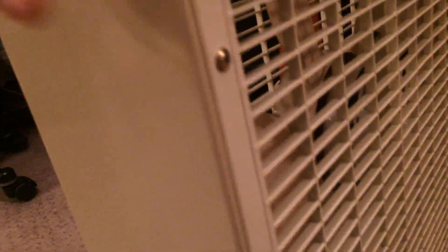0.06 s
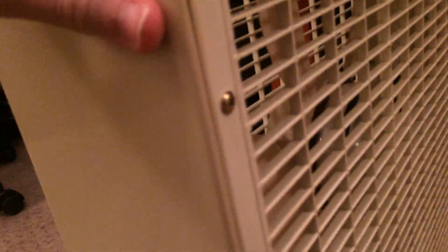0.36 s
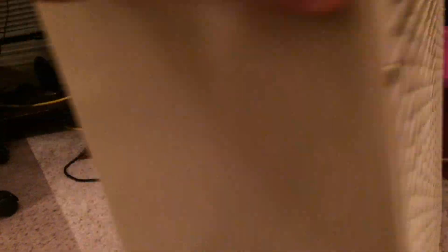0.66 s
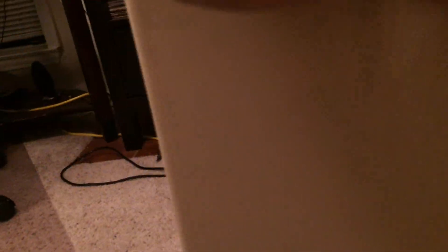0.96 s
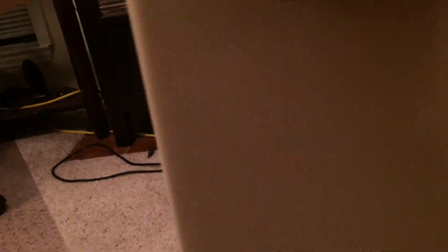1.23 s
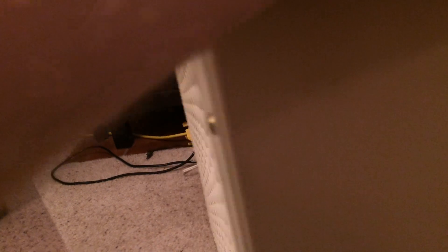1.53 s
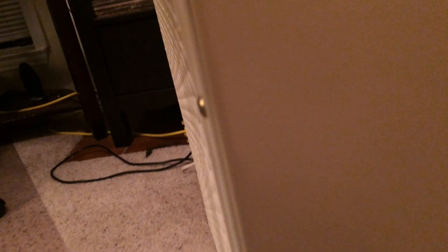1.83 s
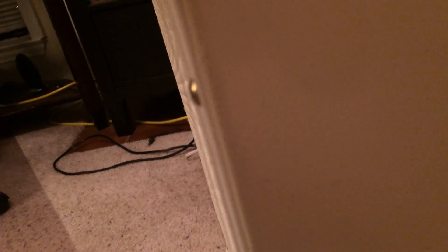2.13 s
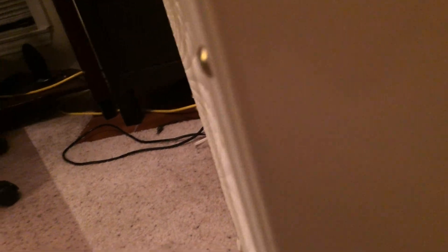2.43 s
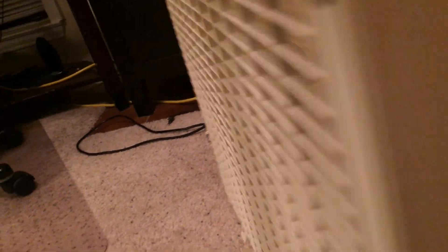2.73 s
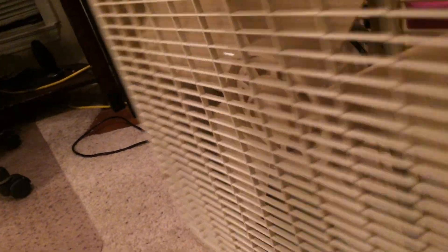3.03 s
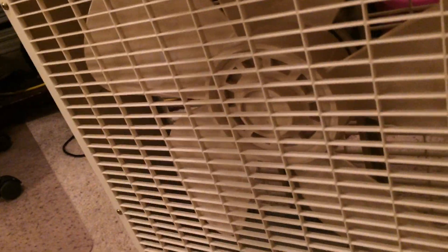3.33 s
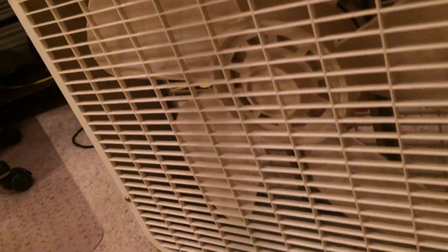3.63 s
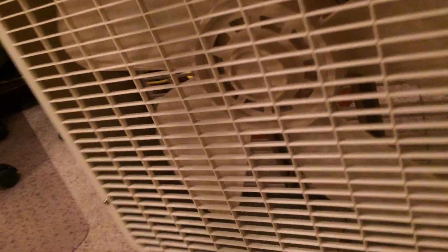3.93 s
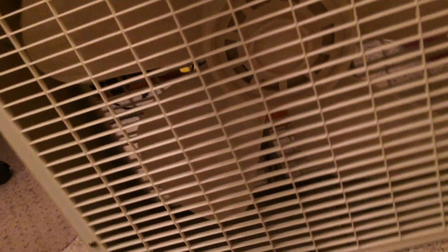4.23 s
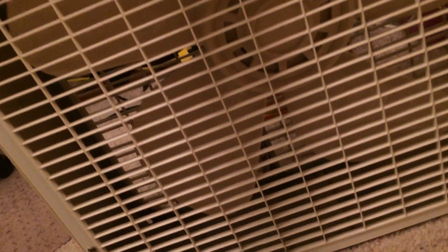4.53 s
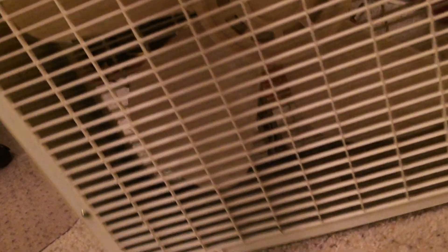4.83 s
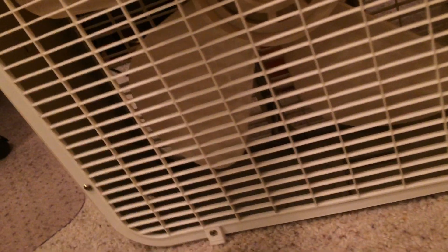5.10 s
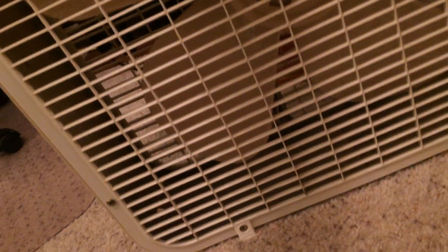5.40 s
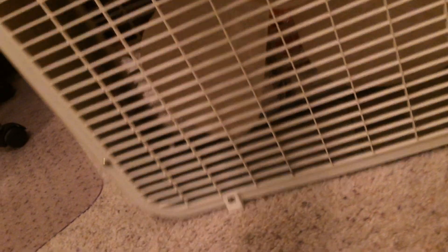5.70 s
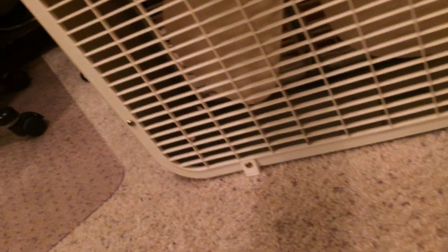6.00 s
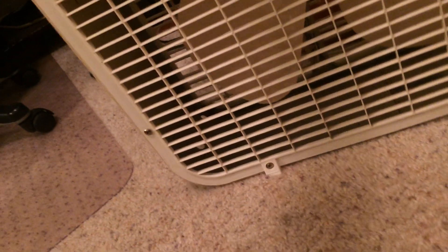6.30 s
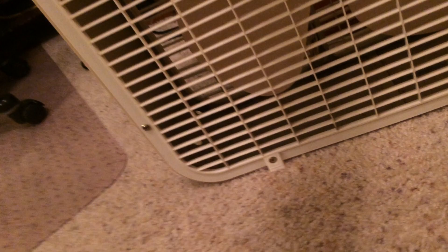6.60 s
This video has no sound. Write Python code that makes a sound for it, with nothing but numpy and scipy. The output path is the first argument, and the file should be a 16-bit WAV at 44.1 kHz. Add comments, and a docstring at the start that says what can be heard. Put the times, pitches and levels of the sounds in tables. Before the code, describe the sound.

A switched-off box fan is set down twice on carpet, each sharp knock ringing its sheet-metal case and rattling the plastic grilles. As it is turned around, the case drags softly over the pile with small ticks and faint creaks, and a hand bumps it dully. Soft rubbing strokes and a light click follow. The microphone is close, in a small room with a low electrical hum.

```python
"""The sheet-metal case of a switched-off box fan is set down twice on carpet, close to the microphone.
Each knock rings the panels and shakes the plastic grilles, which buzz and tick. As the fan is walked
round, the case drags over the pile, its foot scrapes, its frame creaks, and hands bump and brush it.
Soft rubbing strokes and a light click follow. Behind it all is a small room with a low mains hum."""
import sys
import numpy as np
from scipy import signal
from scipy.fft import rfft, irfft
from scipy.io import wavfile
from scipy.ndimage import uniform_filter1d

SR = 44100
rng = np.random.default_rng(int(sys.argv[2]) if len(sys.argv) > 2 else 0)


def int16_out(signal):
    """Quantize to a 16-bit WAV file."""
    q = np.round(np.clip(np.atleast_2d(signal).T, -1, 1) * 32767)
    wavfile.write(sys.argv[1], SR, q.astype(np.int16))


N = 297675
T = np.arange(N) / SR
RING_T = np.arange(SR) / SR  # one second for a struck sound to die away


def gain_of(db):
    """Decibels to amplitude."""
    return 10 ** (np.asarray(db) / 20)


def unit_rms(x):
    """Scales x to rms 1."""
    return x / np.sqrt(np.mean(x ** 2) + 1e-20)


def curve_at(points, hz):
    """Interpolates (Hz, value) points on a log-frequency axis."""
    f, value = np.transpose(points)
    return np.interp(np.log(hz + 1), np.log(f + 1), value)


def add(mix, start, sound):
    """Mixes a sound in at a time in seconds."""
    part = mix[round(start * SR):][:len(sound)]
    part += sound[:len(part)]


def coloured(x, colour, extra_db=lambda hz: 0):
    """Filters x by (Hz, dB) points, plus an optional dB function of frequency."""
    hz = np.fft.rfftfreq(2 * len(x), 1 / SR)
    return irfft(rfft(x, 2 * len(x)) * gain_of(curve_at(colour, hz) + extra_db(hz)))[:len(x)]


def noise(size, colour):
    """Noise of rms 1, shaped by (Hz, dB) points."""
    return unit_rms(coloured(rng.standard_normal(size), colour))


def wander(rate_hz):
    """A smooth random drift of rms 1, up to the given rate."""
    hz = np.fft.rfftfreq(N, 1 / SR)
    return unit_rms(irfft(rfft(rng.standard_normal(N)) / (1 + (hz / rate_hz) ** 4), N))


def during(start, end):
    """A soft-edged window between two times."""
    return np.sin(np.pi / 2 * np.clip(np.minimum(T - start, end - T) / 0.026, 0, 1)) ** 2


def arch(start, end):
    """A push that swells and eases between two times."""
    return np.sin(np.pi * np.clip((T - start) / (end - start), 0, 1))


def attack(rise_s, power=1):
    """An onset rising from 0 to 1; power 2 starts more gently."""
    return 1 - np.exp(-(RING_T / rise_s) ** power)


def modes(table):
    """Struck modes from (Hz, dB, t60 s) rows, neighbours swinging in opposite senses."""
    return sum((-1) ** k * gain_of(db - 60 * RING_T / t60) * np.sin(2 * np.pi * hz * RING_T)
               for k, (hz, db, t60) in enumerate(table))


def clicks(size, per_s, spread_db):
    """A random train of clicks of uneven size and sign."""
    chance, height, sign = rng.random((3, size))
    return (chance < per_s / SR) * gain_of(-spread_db * height) * np.sign(sign - .5)


# Mains hum in the small room. Each row: frequency in Hz, rms level in dB.
HUM_PARTIALS = [(101, -73.5), (120, -50.5), (240, -68)]
# A faint tone that comes and goes in the background. Each row: start and end in seconds, level in dB.
WHINE_SPELLS = [(0.524, 0.65, -59), (0.713, 0.82, -55), (5.35, 5.606, -67), (6.427, 6.677, -62)]
# Room tone behind the fan, rumble and air. Each row: frequency in Hz, relative level in dB.
RUMBLE_COLOUR = [(15, -4), (60, 0.5), (100, 5), (160, -2.5), (210, 1.5), (290, -13.5), (600, -42)]
AIR_COLOUR = [(180, -43), (300, -14), (366, -9.5), (439, -14), (1240, -21), (2610, -30.5), (15500, -48.5)]
def room(whine_hz=445, rumble_db=-53.5, air_db=-65):
    """Slightly wavering hum and a faint whine over a dull rumble and a thin hiss of air."""
    hum = sum(gain_of(db + 1.1 * wander(0.67)) * np.sqrt(2) * np.sin(2 * np.pi * hz * T)
              for hz, db in HUM_PARTIALS)
    whine = np.sqrt(2) * np.sin(2 * np.pi * whine_hz * T + .7 * wander(16))
    whine *= sum(gain_of(db) * during(start, end) for start, end, db in WHINE_SPELLS)
    rumble = gain_of(rumble_db) * noise(N, RUMBLE_COLOUR)
    air = gain_of(air_db) * noise(N, AIR_COLOUR)
    return hum + whine + rumble + air


# Fingertips on the painted metal, faint even up close. Each row: start and end in seconds, level in dB.
FINGER_BRUSHES = [(0.136, 0.3, -67), (3.467, 3.586, -67)]
def brushes():
    """Dry skin on paint gives a thin, bright hiss."""
    hiss = noise(N, [(3000, -8), (7000, 2), (14000, 5.5)])
    return hiss * sum(gain_of(db) * during(start, end) for start, end, db in FINGER_BRUSHES)


def friction(rubs, colour, snag_db, fade_db, bluntness, ring_hz, ring_db, ring_width_hz):
    """Countless fibres let go, a few snagging harder; the hiss swells with the sliding speed."""
    out = np.zeros(N)
    ripple_hz = np.linspace(700, 16000, 170)  # closely spaced resonances
    for start, fastest, stop, db in rubs:
        t = np.arange(start, stop, 1 / SR)
        slowness = np.interp(t, [start, fastest, stop], [1, 0, 1])
        swell = gain_of(db - fade_db * slowness ** bluntness) * signal.windows.tukey(len(t), 0.1)
        snags = unit_rms(clicks(2 * SR, per_s=250, spread_db=24))
        fibres = rng.standard_normal(2 * SR) + gain_of(snag_db) * snags
        ripple_db = 2.2 * rng.standard_normal(len(ripple_hz))

        def resonances_db(hz):
            peak_db = ring_db / (1 + (2 * (hz - ring_hz) / ring_width_hz) ** 2)
            return peak_db + np.interp(hz, ripple_hz, ripple_db)

        hiss = unit_rms(coloured(fibres, colour, resonances_db))
        add(out, start, hiss[:len(t)] * swell)
    return out * gain_of(.9 * wander(25))


# Soft rubbing near the microphone. Each row: start, fastest moment and stop in seconds, level in dB.
RUBS = [(4.72, 5.02, 5.206, -51), (5.14, 5.39, 5.61, -49), (5.52, 5.87, 6.093, -50), (6.0, 6.29, 6.78, -57)]
# Its tone at the microphone. Each row: frequency in Hz, relative level in dB.
RUB_COLOUR = [(200, -16), (450, 0), (950, -1), (1400, -1.5), (2200, 5.5), (2700, 4.5), (3400, 5),
              (4200, -1.5), (5200, 2), (8000, 1), (12000, -0.5), (15000, 0.5)]
def strokes():
    """Light rubbing gives a smooth hiss with hardly a snag."""
    return friction(RUBS, RUB_COLOUR, snag_db=-25, fade_db=39, bluntness=2.19,
                    ring_hz=2640, ring_db=1, ring_width_hz=440)


# The case pushed over the carpet. Each row: start, fastest moment and stop in seconds, level in dB.
PUSHES = [(.38, .76, 0.79, -52), (1.0, 1.58, 1.82, -56.5), (2.25, 2.56, 2.67, -63.5),
          (2.52, 3.26, 3.452, -45.5), (3.89, 4.25, 4.61, -44.5)]
# The carpet's hiss from close by. Each row: frequency in Hz, relative level in dB.
PILE_COLOUR = [(200, -6), (450, -10.5), (1400, -5.5), (2150, 1), (2900, -2.5), (4500, -5), (6500, -3),
               (9000, -7), (15000, -6.5)]
def drags():
    """The pile snags under the sliding case: a grainy hiss with one narrow resonance."""
    return friction(PUSHES, PILE_COLOUR, snag_db=-15.5, fade_db=30, bluntness=2.01,
                    ring_hz=2070, ring_db=7, ring_width_hz=100)


# The fan's frame. Each row: mode frequency in Hz, relative level in dB, time to fall 60 dB in seconds.
FRAME_MODES = [(186, 4.5, 0.021), (337, 2, 0.033), (382, -3, 0.043), (905, -3, 0.0058)]
# The frame creaking under the hand, close up.
# Each row: start and end in seconds, judder level in dB, squeak pitch in Hz, squeak level in dB.
FRAME_CREAKS = [(1.795, 2.088, -54.5, 2820, -69), (2.243, 2.31, -67.5, 1940, -68),
                (4.372, 4.782, -52, 2750, -67.5)]
def creaks(uneven_db=4.5):
    """Uneven slips of the grille judder the frame and ring one thin squeak."""
    out = np.zeros(N)
    for start, end, judder_db, squeak_hz, squeak_db in FRAME_CREAKS:
        slips = clicks(N, per_s=400, spread_db=8)
        judder = unit_rms(signal.fftconvolve(slips, modes(FRAME_MODES))[:N])
        squeak = unit_rms(signal.fftconvolve(slips, modes([(squeak_hz, 0, .02)]))[:N])
        out += during(start, end) * gain_of(judder_db) * judder
        out += arch(start, end) * gain_of(squeak_db) * squeak
    return out * gain_of(uneven_db * wander(33))


# Dull bumps of the hand on the frame, close up. Each row: start in seconds, strength in dB.
HAND_BUMPS = [(4.1084, -27), (4.1248, -25.5)]
def bumps(rise_s=0.00089, thud_hz=350, thud_t60=0.062, frame_db=-6, scuff_db=-10, scuff_s=0.018):
    """The hand damps what it hits: a short thud of the frame and a scuff of skin."""
    out = np.zeros(N)
    thud = modes([(thud_hz, 0, thud_t60)]) + gain_of(frame_db) * modes(FRAME_MODES)
    for start, db in HAND_BUMPS:
        scuff = noise(SR, [(450, 4.5), (2800, -17), (6000, -25)]) * np.exp(-RING_T / scuff_s)
        add(out, start, gain_of(db) * (thud + gain_of(scuff_db) * scuff) * attack(rise_s))
    return out


# The plastic grille ticking by the microphone. Each row: start in seconds, strength in dB, pitch in Hz.
GRILLE_TICKS = [(0.9838, -36, 3500), (1.611, -27, 2750), (1.7792, -39, 3500), (1.8284, -41.5, 2950),
                (2.625, -46, 2660), (3.3154, -32, 3670), (4.2524, -29.5, 7300), (4.3101, -30.5, 3440),
                (6.4023, -33.5, 4630), (6.4597, -42, 6500), (6.6368, -49.5, 4380), (6.6898, -45.5, 4700)]
def ticks(gain_db=-6, rise_s=0.00086, snap_s=0.0037, tail_db=-16, tail_s=0.04):
    """A bar of the grille snaps: a short burst round its own pitch and a faint tail."""
    out = np.zeros(N)
    decay = np.exp(-RING_T / snap_s) + gain_of(tail_db) * np.exp(-RING_T / tail_s)
    for start, db, hz in GRILLE_TICKS:
        burst = noise(SR, [(hz / 5, -12), (hz * .7, -7), (hz, 0), (hz * 1.4, -7), (hz * 4, -13)])
        add(out, start, gain_of(db + gain_db) * burst * attack(rise_s) * decay)
    return out


# The case's finer modes, with the room behind them. Each row: frequency in Hz, relative level in dB.
CLATTER_COLOUR = [(25, -25), (70, 6), (150, 7), (400, 5), (1000, -1), (1500, -6.5), (2200, -10.5),
                  (4000, -11.5), (8000, -18.5), (15000, -42.5)]
# How they linger in the room. Each row: frequency in Hz, time to fall 60 dB in seconds.
CLATTER_DECAY = [(60, 0.43), (200, 0.33), (700, 0.36), (2000, 0.46), (5000, 0.32), (14000, 0.46)]
def clatter():
    """Dense ringing: each band dies at its own speed, and the treble builds as the panels shudder."""
    hz, t, bands = signal.stft(rng.standard_normal(SR), SR, nperseg=1024)
    # random peaks in the middle range ring louder and longer
    peaks = unit_rms(uniform_filter1d(rng.standard_normal(len(hz)), size=2)) * (hz > 400) * (hz < 3500)
    t60 = curve_at(CLATTER_DECAY, hz) * np.exp(.1 * peaks)
    levels = unit_rms(gain_of(curve_at(CLATTER_COLOUR, hz) + 1.5 * peaks))
    bands = bands * levels[:, None] * gain_of(-60 * t / t60[:, None])
    ring = signal.istft(bands, SR, nperseg=1024)[1][:SR]
    treble = coloured(ring, [(1200, -40), (3000, 0)])
    return (ring - treble) * attack(.0015) + treble * attack(.004, power=2)


# The foot of the case pivoting on the carpet. Each row: start and end in seconds, level in dB.
FOOT_SCRAPES = [(.56, 0.769, -63), (2.445, 2.71, -55.5)]
def scrapes():
    """Fine catches of the pile shake the middle range of the case."""
    catches = clicks(N, per_s=400, spread_db=2)
    ring = signal.fftconvolve(catches, clatter())[:N]
    ring = unit_rms(coloured(ring, [(150, -21), (450, -2.5), (900, -6), (2300, -5), (6000, -23)]))
    return ring * sum(gain_of(db) * arch(start, end) for start, end, db in FOOT_SCRAPES)


def chatter(rise_s=0.0092, t60=0.16, snap_s=0.0024):
    """The loose grille buzzes against the case after a blow."""
    contacts = clicks(SR, per_s=500, spread_db=3) * attack(rise_s) * gain_of(-60 * RING_T / t60)
    snap = rng.standard_normal(SR) * np.exp(-RING_T / snap_s)
    snap = coloured(snap, [(400, -22), (2500, 9), (6000, 5), (15000, 3)])
    return signal.fftconvolve(contacts, snap)[:SR]


def crack(width_s=0.0012, splinter_db=-13, splinter_s=0.008):
    """The hard first contact: one bipolar push of air, then a splinter of noise."""
    age = RING_T / width_s
    push = (1 - age) * np.exp(-age) * attack(width_s / 4)
    splinter = rng.standard_normal(SR) * np.exp(-RING_T / splinter_s) * attack(.005, power=2)
    return push + gain_of(splinter_db) * splinter


# Case and grilles ringing. Each row: frequency in Hz, relative level in dB, time to fall 60 dB in seconds.
CASE_MODES = [(122.7, -25.5, 5.8), (159.5, -17, 0.53), (187, -9.5, 0.54), (191, -32, .3),
              (250, -21.5, 0.61), (313.5, -7.5, 0.15), (368, -6.5, 0.13), (429, -27.5, 0.65),
              (554, -26.5, 0.65), (574, -19, 0.51), (663.6, -7.5, 0.12), (676, -21.5, 0.49),
              (709, -9.5, 0.12), (822, -24.5, 0.6), (946, -20.5, 0.36), (983, -15, 0.19),
              (1275, -10.5, 0.079), (1443, -19, 0.38), (1536, -14, 0.12), (1930, -18.5, 0.33),
              (2090, -19, 0.17), (2615, -34.5, 0.24), (2900, -28.5, .25), (3210, -27, 0.19)]
# Two set-downs and the lighter taps, close to the microphone. Each row: start in seconds, strength
# in dB, pitch of the struck spot in Hz, hardness as treble gain in dB, build-up in seconds.
CASE_BLOWS = [(.350, -40.5, 750, -11, 0.0086), (0.7826, -10, 990, -2.5, 0.00014),
              (1.077, -39.5, 655, -6, 0.0019), (1.116, -37, 504, -6, 0.012), (1.206, -38, 400, -25, 0.011),
              (1.5802, -14, 260, -9.5, 0.00065), (2.16, -54, 680, -23.5, 0.0021),
              (2.251, -41.5, 546, -15, .003), (2.783, -46, 1850, -1.5, 0.0026),
              (3.2173, -36.5, 1870, 6.5, 0.00063), (3.886, -50, 730, -6.5, 0.0029),
              (6.401, -41, 1970, -8, .0024), (6.683, -43.5, 940, -10, 0.014)]
def blows(clatter_db=-7, crack_db=-4, spot_cycles=14, mid_spot_hz=700):
    """The struck spot rings for a few cycles and hands its energy to the whole case."""
    out = np.zeros(N)
    case_ring = modes(CASE_MODES)
    for start, db, spot_hz, treble_db, rise_s in CASE_BLOWS:
        # a stiff, high-pitched spot rings more itself and passes less bass to the case
        stiffness = np.log2(spot_hz / mid_spot_hz)
        bass_db = -3.5 - 2.5 * stiffness
        spot_db = 1.5 + 6 * stiffness - 0.1 * db  # a light tap stays in its spot; a heavy blow spreads
        spot = modes([(spot_hz, spot_db, spot_cycles / spot_hz)])
        # a harder contact brings more of the middle range and shakes the grille more
        mid_db = 0.18 * treble_db + min(bass_db, 0) / 2
        buzz_db = -6 + 1.4 * treble_db
        body = case_ring + gain_of(clatter_db) * clatter() + gain_of(crack_db) * crack()
        body = coloured(body, [(70, 0.013), (170, bass_db), (330, bass_db), (550, mid_db),
                               (2500, treble_db / 2), (12000, treble_db)])
        buzz = gain_of(buzz_db) * chatter()
        add(out, start, gain_of(db) * (body + spot + buzz) * attack(rise_s))
    return out


def scene():
    """The fan and the room behind it, at one close microphone."""
    sliding = drags() + strokes()
    knocks = blows() + bumps() + ticks()
    return (knocks + sliding + brushes() + scrapes() + creaks() + room())[None]


def record(dry, low_cut_hz=48, band_limit_hz=15420):
    """The microphone sheds the deepest bass and the recorder cuts the highest treble."""
    low_cut = signal.butter(2, low_cut_hz, "high", fs=SR, output="sos")
    band_limit = signal.firwin(511, band_limit_hz, window=("kaiser", 9), fs=SR)
    return signal.oaconvolve(signal.sosfilt(low_cut, dry), band_limit[None], "same")


dry = scene()
out = record(dry)
int16_out(out)
```